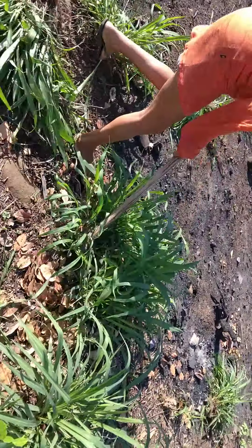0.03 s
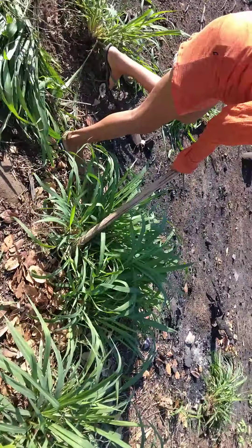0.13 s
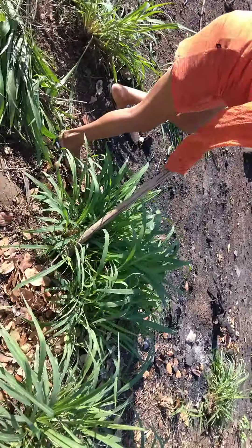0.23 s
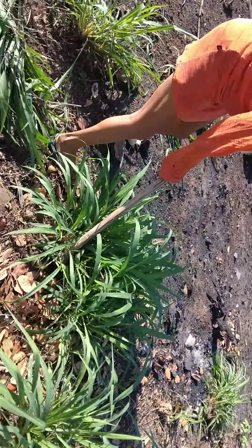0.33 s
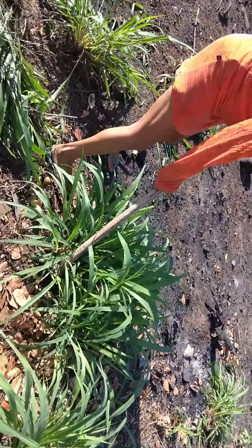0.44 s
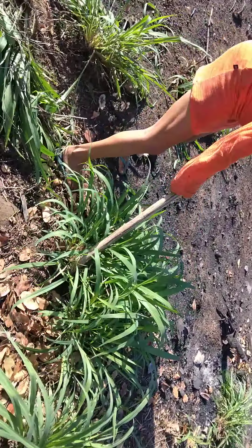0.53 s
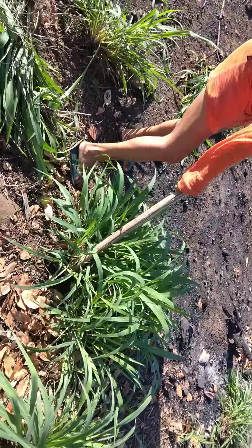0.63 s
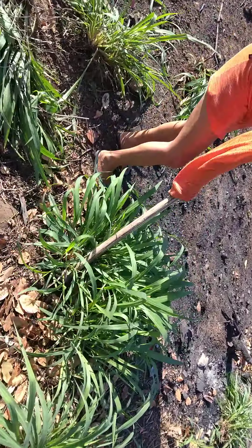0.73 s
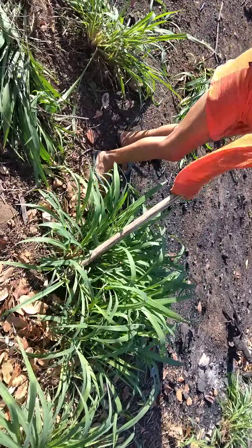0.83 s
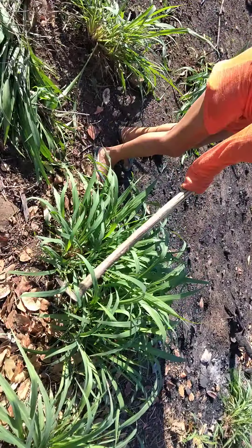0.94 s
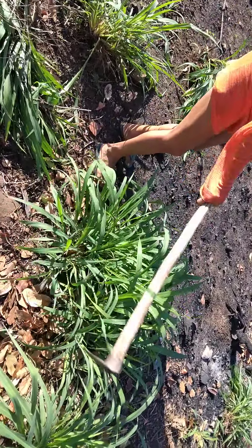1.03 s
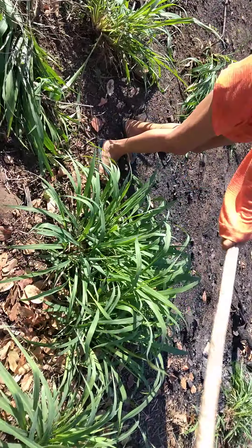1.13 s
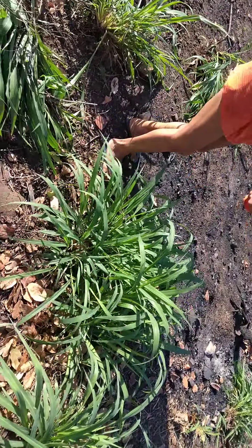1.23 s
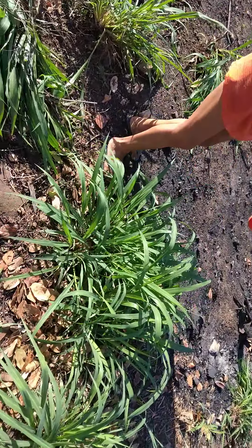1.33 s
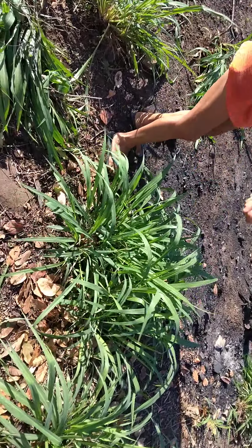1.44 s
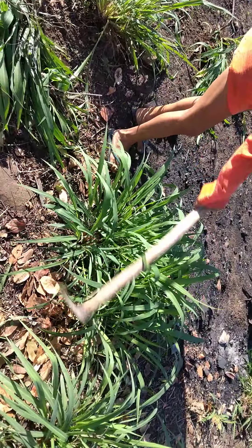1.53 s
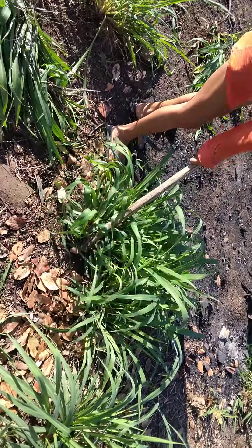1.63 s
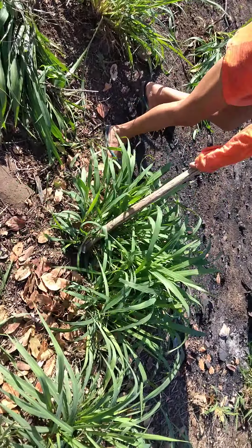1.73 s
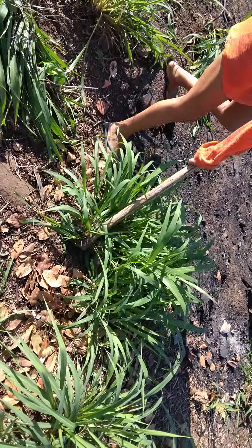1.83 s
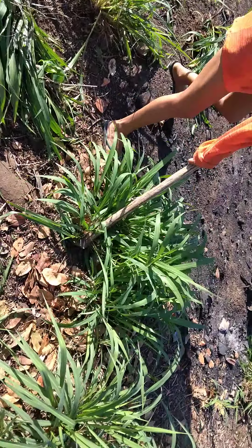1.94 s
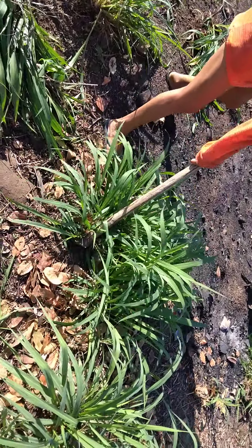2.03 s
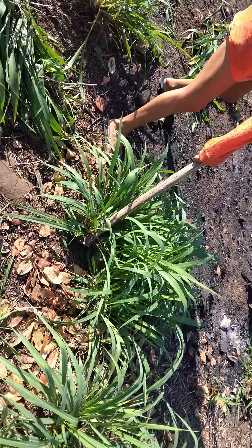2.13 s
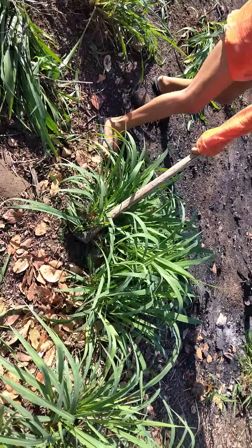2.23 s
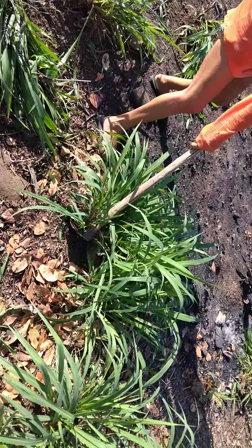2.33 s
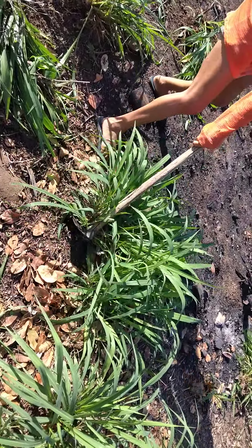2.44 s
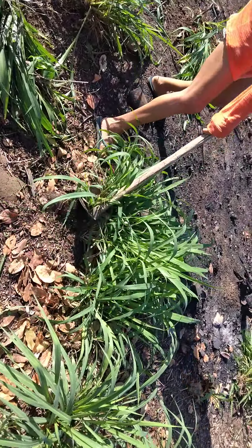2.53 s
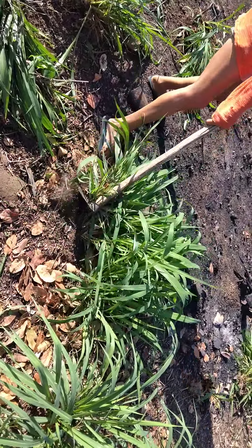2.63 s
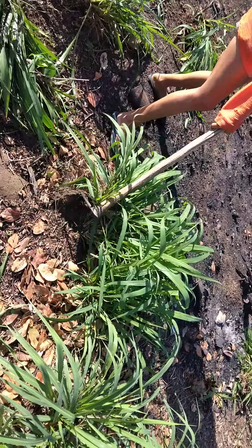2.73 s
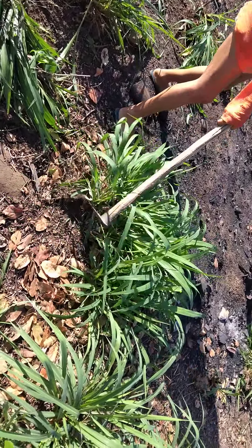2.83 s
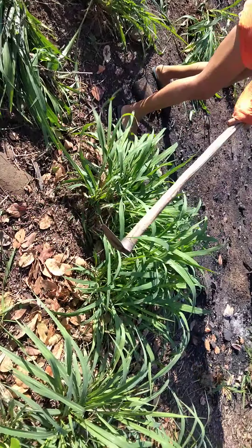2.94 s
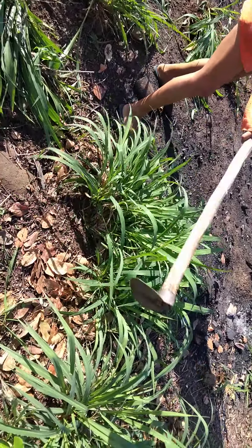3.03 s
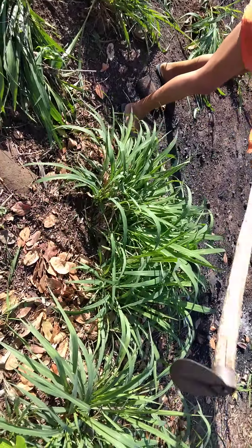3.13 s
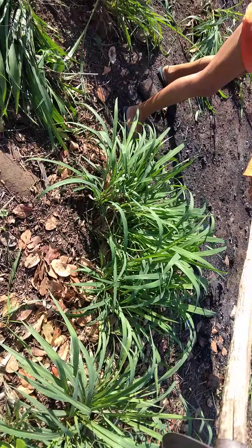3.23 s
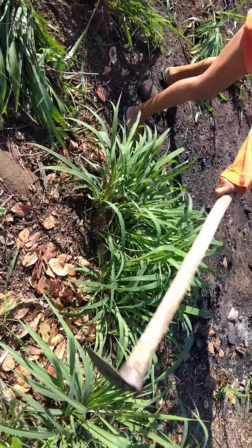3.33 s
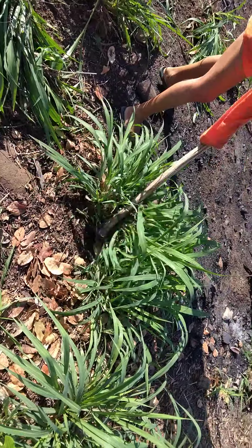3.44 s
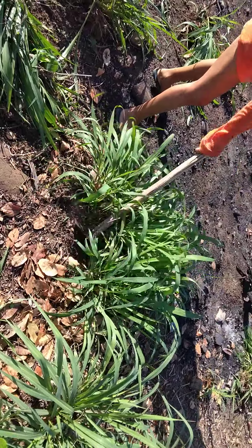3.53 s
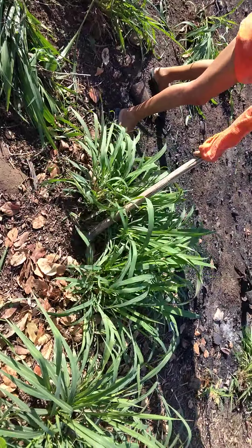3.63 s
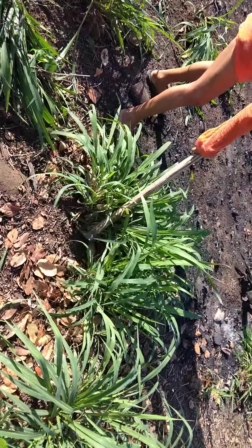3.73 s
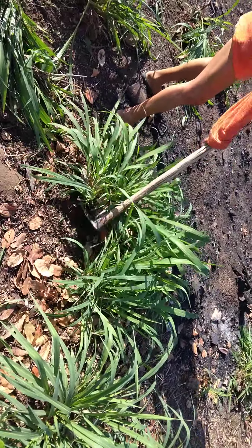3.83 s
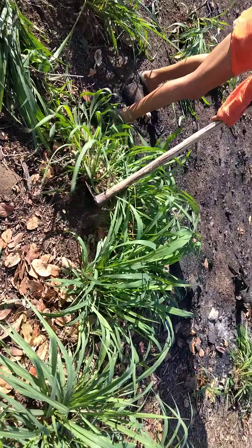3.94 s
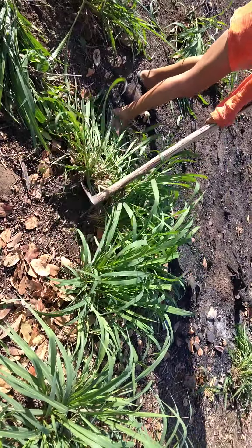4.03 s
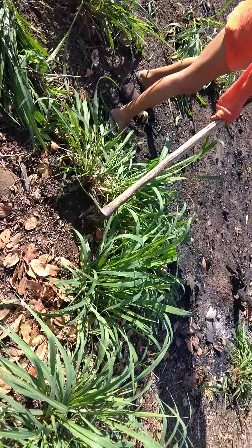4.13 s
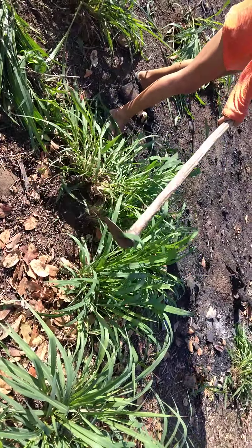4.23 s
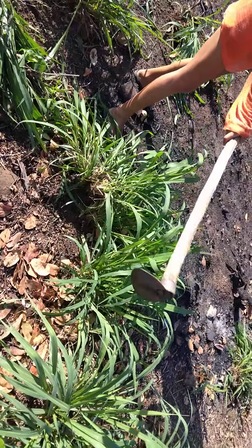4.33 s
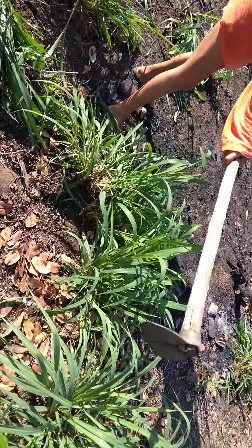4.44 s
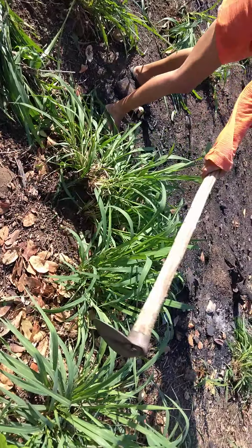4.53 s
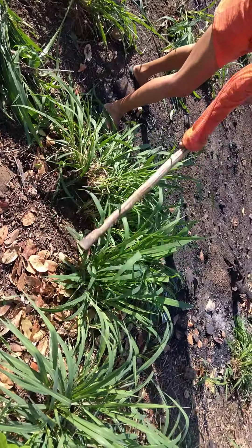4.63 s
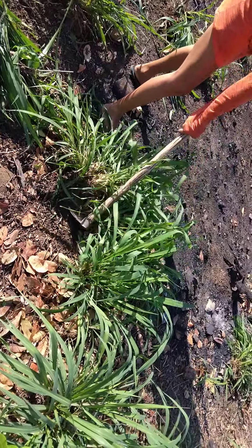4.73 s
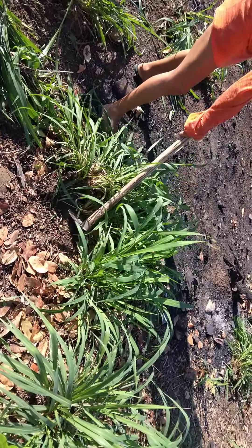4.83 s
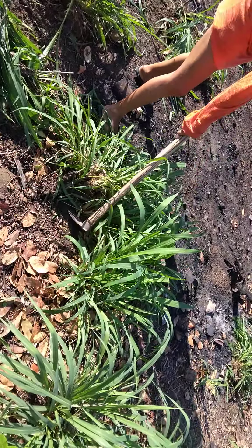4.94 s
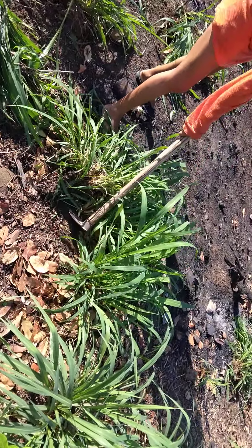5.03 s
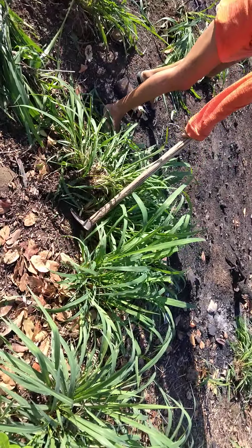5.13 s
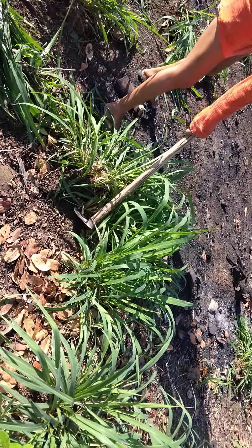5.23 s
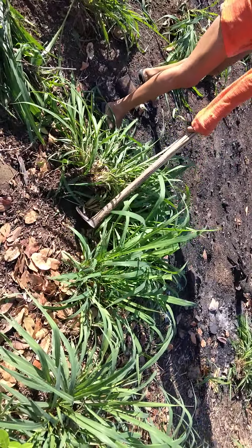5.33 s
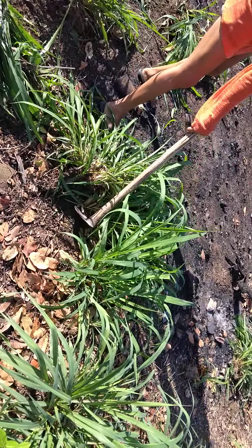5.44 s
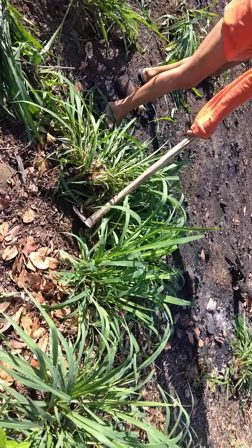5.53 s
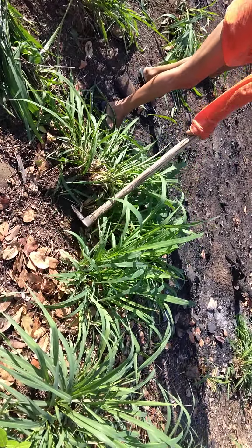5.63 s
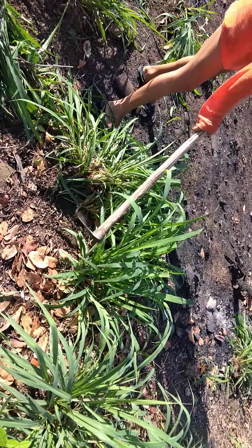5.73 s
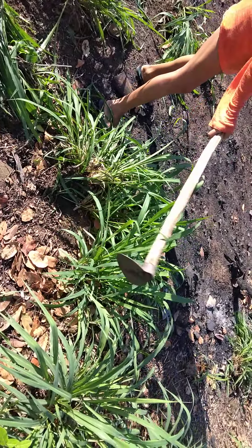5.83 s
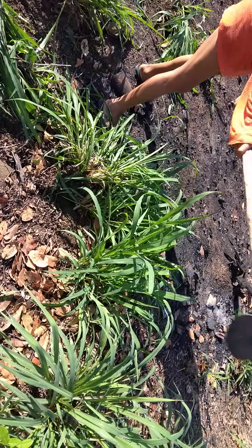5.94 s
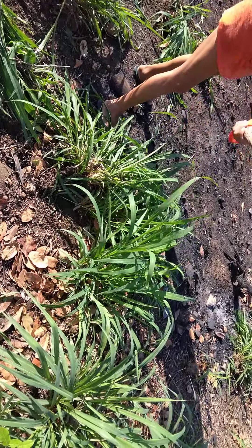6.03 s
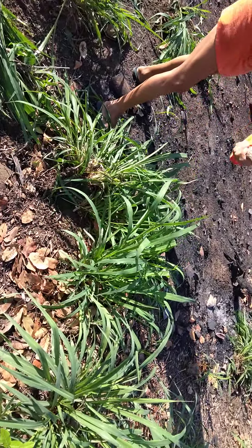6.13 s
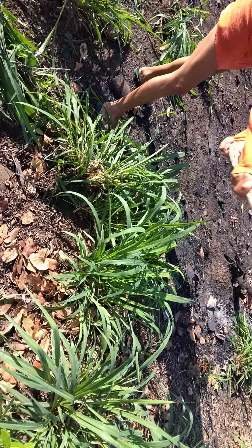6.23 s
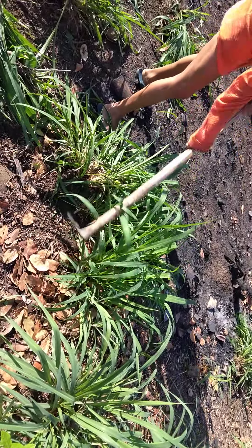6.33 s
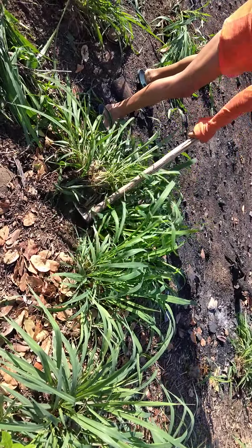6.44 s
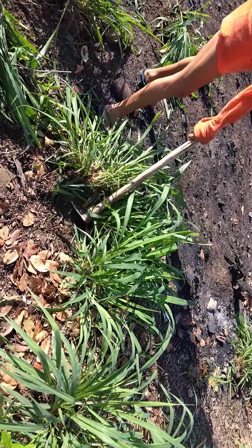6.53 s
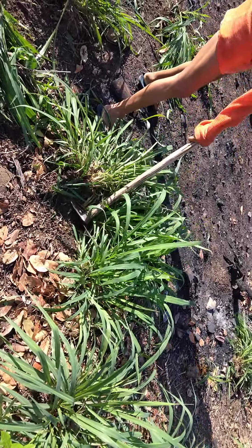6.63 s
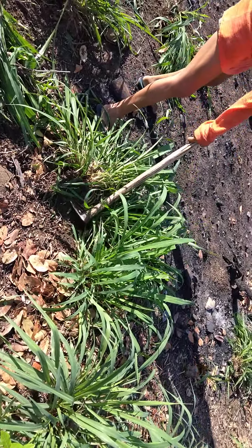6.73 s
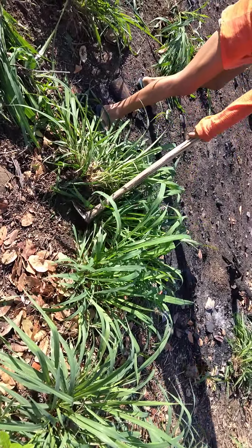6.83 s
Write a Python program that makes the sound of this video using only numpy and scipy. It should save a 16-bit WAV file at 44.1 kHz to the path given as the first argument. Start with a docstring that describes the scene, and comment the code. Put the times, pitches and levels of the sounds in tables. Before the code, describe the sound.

Close outdoor stereo sound of a hoe working a grass clump in dry soil. At 0.03 s the first and brightest blow slices leaves with a loud crunch and short thud. Rustling and gritty tugs swell around 0.5-1.1 s, then drop away. A low wind bump comes near 1.6 s as the second chop lands at 1.58 s; a strong tearing drag follows at 2.2-2.6 s, thick with snapping roots and crackling soil. After a lull, the third blow at 3.45 s crunches and thuds, with hard snaps and rustle at 3.8-3.9 s. The fourth, at 4.68 s, is softer and duller, followed by sparse ticks and a small leafy brush near 5.75 s. After quiet, the fifth at 6.37 s lands with a heavy thud and sharp woody clod knock, then light settling. Faint far bird notes and low wind lie beneath.

```python
"""A hand hoe chops five times into a grass clump on dry soil and is dragged back out, outdoors.
Each blow slices leaves, crunches and thuds; then the clump settles, and tugs make leaf and soil crackle.
Roots and stalks snap as short wavelets, which also give a low clod thud and the last blow's sharp knock.
From the second second on, far birds call as wavering sines with noise echoes.
Low noise and pops of wind buffet two unlike microphone ports over a far wash; a gate dims quiet treble."""
import sys
import numpy as np
from scipy import signal
from scipy.fft import rfft, irfft
from scipy.io import wavfile
from scipy.ndimage import uniform_filter1d

SR = 44100
rng = np.random.default_rng(int(sys.argv[2]) if len(sys.argv) > 2 else 0)


def undo_db(level):
    """Turn decibels back into plain size, where 20 dB means ten times bigger."""
    steps = np.asarray(level, float) / 20
    return 10 ** steps


def int16_out(signal):
    """Quantize to a 16-bit WAV file."""
    q = np.round(np.clip(np.atleast_2d(signal).T, -1, 1) * 32767)
    wavfile.write(sys.argv[1], SR, q.astype(np.int16))


N = 304290
T = np.arange(N) / SR
# samples by which the left port hears later, and its spread across the clump
LEFT_LAG_SAMPLES, LAG_SPREAD_SAMPLES = 3.33, 2.23

# hoe blows, levels ahead of the ports:
# start_s, crunch_db, grit_db, clod_knock_db, clod_pitch_hz, thud_db, crunch_length_s
BLOWS = [(0.028, -3, -7, -11, 848, -14, 0.008), (1.58, -9.5, -11, -15.5, 927, -13.5, 0.016),
         (3.446, -8, -11, -16.5, 374, -14.5, .010), (4.676, -15.5, -16.5, -12.5, 710, -10.5, 0.0097),
         (6.3692, -13, -10, -7, 432, -6.5, 0.0115)]
# modes of a knocked clod: multiple_of_clod_pitch, level_db, t60_s
CLOD_MODES = [(1., 6, 0.021), (1.95, 3, 0.017)]


def hoe():
    """Leaves hiss and soil crumbles under the drag; each blow slices in, crunches and thuds."""
    # packed ground: pitch_hz, level_db, t60_s
    thud_modes = [(70, -7, 0.07), (156, 0.5, 0.033)]
    # the hoe itself: pitch_hz, level_db, t60_s
    handle_modes = [(1323, -9.5, 0.026)]
    soil_db, soil_db_per_pull_db, soil_db_per_dryness = -65, 1.76, 0.87  # soil_db: at a -46 dB pull, dryness 0

    pull_db, dryness = pull()
    leaf = undo_db(pull_db)
    # harder pulls tear more soil
    soil = undo_db(soil_db + soil_db_per_pull_db * (pull_db + 46.0) - soil_db_per_dryness * dryness)

    ground, crunch = np.zeros(N), np.zeros(N)
    for start_s, crunch_db, grit_db, knock_db, clod_hz, thud_db, length_s in BLOWS:
        envelope = blow_envelope(T - start_s, length_s)
        crunch += undo_db(crunch_db) * envelope
        soil += undo_db(grit_db) * envelope
        add(ground, start_s + 0.19 * length_s, undo_db(crunch_db) * ring(handle_modes))
        # the blade stops midway through the crunch
        stop = undo_db(thud_db) * ring(thud_modes) + undo_db(knock_db) * ring(CLOD_MODES, clod_hz)
        add(ground, start_s + 0.55 * length_s, stop)

    fine = crackle(9000, spread_db=0.0, clump_db=1.5) + 0.35 * ticks(200)
    fine = filtered(fine, 2, 1800, "high")  # leaves are too small for bass
    low = filtered(fine, 1, 5500, "low")
    high = fine - low
    packed = low + 0.5 * high  # leaves crushed into soil sound duller
    rustle = low * undo_db(-0.4 * (dryness - 0.5)) + high * undo_db(0.78 * (dryness + 2.5))
    coarse = crackle(6000, spread_db=2.5, clump_db=2.5)
    coarse = evened(filtered(coarse, 1, (750, 2000), "band"))
    return leaf * rustle + crunch * packed + soil * coarse + heard_from(ground, LEFT_LAG_SAMPLES)


def blow_envelope(u, length_s):
    """The blade speeds up through the leaves for 19 ms, then bites: a burst, then falling debris."""
    slicing = undo_db(-14.5 + 430 * np.minimum(u, 0)) * (u > -0.019) * (u < 0)
    after = np.maximum(u, 0) / length_s
    burst = np.exp(-(np.maximum(after - 0.4, 0) / 0.6) ** 2)
    debris = 0.033 * np.exp(-after / 3.9)
    return slicing + np.minimum(after * 1.7, 1) * (burst + debris)


def pull():
    """Level in dB and dryness of the rustle: tugs swell and fade, the clump settles after each blow."""
    # tugs and brushes of the blade through the clump:
    # peak_s, rustle_db, swell_s, fade_s, dryness (higher is brighter)
    tugs = [(0.01, -33.5, 0.12, 0.053, 1), (0.493, -44.5, 0.18, 0.26, -10), (0.735, -34, 0.18, 0.15, -7.5),
            (0.875, -37, 0.05, 0.34, -2.5), (0.966, -36.5, 0.085, 0.06, -2.5),
            (1.05, -40, 0.081, 0.043, 3.5), (1.148, -52.5, 0.25, 0.45, -5.5),
            (2.259, -47, 0.41, 0.66, -11.5), (2.513, -28.5, 0.16, 0.18, -6.5),
            (2.708, -39.5, 0.41, 0.48, -6.5), (3.425, -43, 0.062, 0.076, -3.5),
            (3.75, -49.5, 0.86, 0.71, -8.5), (3.827, -31, 0.038, 0.23, -5), (3.89, -32, 0.19, 0.45, -4),
            (5.34, -51.5, 0.45, 0.89, -6), (5.714, -52, 0.27, 0.23, -3), (5.731, -41.5, 0.018, 0.06, 4),
            (5.752, -48, 0.06, 0.025, 0.5), (5.819, -42.5, 0.024, 0.083, 5),
            (6.833, -48.5, 0.061, 0.23, -6.5)]
    span_db, bend = 22.5, 0.99  # fall over one swell_s or fade_s, and the exponent of its course in time
    # two stages of settling after a blow: start_db, fall_db_per_s
    settling = [(-31.5, 152), (-40, 42.7)]
    settle_dryness, settle_after_s = -3.5, 0.022
    # rustle held back while the hoe is lifted clear or held still: from_s, to_s
    pauses = [(1.222, 1.54), (2.02, 2.10), (3.1, 3.385), (4.418, 4.64), (5.05, 5.153), (5.527, 5.555),
              (5.884, 6.33)]
    pause_drop_db, pause_edge_s = -8.5, 0.0056
    still_db, still_dryness = -67, -0.5  # floor of stirring leaves

    power, dry_power = np.zeros(N), np.zeros(N)
    for peak_s, rustle_db, swell_s, fade_s, dryness in tugs:
        away = np.where(T < peak_s, (peak_s - T) / swell_s, (T - peak_s) / fade_s)
        part = undo_db(2 * (rustle_db - span_db * abs(away) ** bend))
        power += part
        dry_power += part * dryness
    for start_s, *_ in BLOWS:
        u = T - start_s
        stages = sum(undo_db(2 * (db - fall * abs(u - settle_after_s))) for db, fall in settling)
        part = stages * (u > 0)
        power += part
        dry_power += part * settle_dryness

    paused = sum(np.clip(np.minimum(T - a, b - T) / pause_edge_s, 0, 1) for a, b in pauses)
    left, still = undo_db(2 * pause_drop_db * paused), undo_db(2 * still_db)
    power = power * left + still
    dry_power = dry_power * left + still * still_dryness
    return 10 * np.log10(power), dry_power / power


def crackle(per_s, spread_db, clump_db, count=7):
    """Tiny clicks with clumped levels, scattered over several spots of the plant."""
    clumps = evened(uniform_filter1d(rng.standard_normal(N), size=900))
    size = undo_db(spread_db * np.minimum(rng.exponential(1, N), 5) + clump_db * clumps)
    clicks = size * rng.standard_normal(N) * (rng.random(N) < per_s / SR)
    spot = rng.integers(0, count, N)
    lags = LEFT_LAG_SAMPLES + LAG_SPREAD_SAMPLES * np.linspace(-1, 1, count) * np.sqrt(3)
    return evened(sum(heard_from(clicks * (spot == k), lag) for k, lag in enumerate(lags)))


def ticks(per_s):
    """Sparse crisp leaf ticks of a few milliseconds, in nine groups each with its own pitch and spot."""
    t, out = np.arange(300) / SR, np.zeros((2, N))
    for hz, side in zip(np.geomspace(2200, 11000, 9), rng.uniform(-1, 1, 9)):
        size = undo_db(1.3 * np.minimum(rng.exponential(1, N), 3.5))
        hits = size * (rng.random(N) < per_s / 9 / SR)
        grain = filtered(rng.standard_normal(300), 1, (hz * 0.7, hz * 1.4), "band")
        burst = signal.oaconvolve(hits, grain * undo_db(-60 * t / 0.008))[:N]
        out += heard_from(burst, LEFT_LAG_SAMPLES + LAG_SPREAD_SAMPLES * side)
    return evened(out)


def ring(modes, unit_hz=1):
    """Damped modes that are driven up within a few milliseconds."""
    t = np.arange(5000) / SR
    rise = 1 - np.exp(-t / 0.0015)
    return rise * sum(undo_db(db - 60 * t / t60_s) * np.sin(2 * np.pi * unit_hz * f * t) for f, db, t60_s in modes)


def snaps_and_knocks():
    """Each snap or knock is a short wavelet, five weaker ones within 6 ms and a jolt of the clod."""
    # breaking roots and stalks, plus a low clod thud at 2.8 s and the sharp knock of the last blow;
    # levels ahead of the ports: start_s, peak_db, pitch_hz
    hits = [(0.2693, -25, 7860), (0.7554, -18, 3200), (0.7908, -19.5, 4630), (1.0109, -16.5, 5560),
            (1.544, -27.5, 5000), (1.5624, -26, 3680), (2.07, -33.5, 4550), (2.2263, -6, 2950),
            (2.3069, -18.5, 2430), (2.3929, -14, 3230), (2.4347, -10.5, 3080), (2.4469, -9, 4050),
            (2.4509, -14.5, 2380), (2.4601, -10, 2170), (2.4647, -19, 2000), (2.4901, -8, 3350),
            (2.506, -10.5, 3600), (2.5128, -7.5, 2610), (2.5237, -13, 2620), (2.5679, -14.5, 2920),
            (2.802, -32, 897), (3.3902, -34, 3640), (3.431, -26, 3170), (3.4899, -16, 1500),
            (3.5705, -24.5, 1500), (3.8221, -4, 7300), (3.8309, -15.5, 2220), (3.8364, -21, 2500),
            (3.8506, -12, 2920), (3.857, -15, 3300), (3.8813, -4.5, 3040), (3.9204, -15, 3300),
            (4.2469, -30.5, 3520), (4.6441, -29, 2470), (4.657, -25, 885), (5.0313, -37.5, 7000),
            (5.1568, -35.5, 2950), (5.6027, -33, 3750), (5.7306, -41, 4600), (5.8122, -23.5, 6500),
            (5.839, -24, 4240), (6.016, -43.5, 4470), (6.121, -45, 5090), (6.245, -44.5, 4510),
            (6.333, -24.5, 1800), (6.357, -14.5, 3300), (6.3737, -2, 775), (6.8882, -18.5, 4260)]
    out, t = np.zeros(N), np.arange(-60, 61) / SR
    chance = rng.random((len(hits), 6, 3))
    for (start_s, peak_db, pitch_hz), rows in zip(hits, chance):
        for k, (when, pitch, loss) in enumerate(rows):
            f = pitch_hz * (1 if k == 0 else 0.46 + 0.81 * pitch)
            wavelet = -np.cos(2 * np.pi * f * t) * np.exp(-(t * f / 0.39) ** 2)
            delay_s = 0.0009 * (k + when - 0.5) * (k > 0)
            weaker_db = (k > 0) * (2 + 12 * loss + 2 * k)
            add(out, start_s + delay_s - 0.0005, undo_db(peak_db - weaker_db) * wavelet)
        # lower hits jolt the clod more
        add(out, start_s, undo_db(peak_db - 18.5 - pitch_hz / 500) * ring(CLOD_MODES, 320))
    return heard_from(out, LEFT_LAG_SAMPLES)


def at_ports(airborne):
    """Cavity resonances of each port colour the near sounds."""
    # cavity response of each port: pitch_hz, gain_db
    left_port = [(200, -7.5), (1000, -17), (2200, -9.5), (3700, -1), (5500, -6.5), (6500, -9), (7600, 0.5),
                 (8900, -11.5), (12000, -22.5), (16000, -20.5)]
    right_port = [(200, -6.5), (1200, -16.5), (3700, -13), (6000, -15.5), (8000, -16.5), (9500, -12),
                  (10700, -4), (12500, -16.5), (16000, -27.5)]
    responses = np.array([causal(left_port), causal(right_port)])
    return undo_db(5.5) * signal.oaconvolve(airborne, responses, axes=1)[:, :N]


def birds():
    """Soft wavering notes from far away, each trailed by a blurred echo off the field."""
    # start_s, length_s, pitch_hz, level_db
    notes = [(1.233, 0.11, 2690, -68.5), (2.972, 0.053, 682, -64), (4.283, 0.029, 703, -61.5),
             (4.424, 0.22, 2515, -69), (5, 0.15, 2650, -69.5), (6.442, 0.069, 689, -49.5)]
    out, t = np.zeros(N), np.arange(8000) / SR
    for start_s, length_s, pitch_hz, level_db in notes:
        size = round(length_s * SR)
        waver = evened(uniform_filter1d(rng.standard_normal((2, size)), size=600))
        tone = np.sin(2 * np.pi * np.cumsum(pitch_hz + 7 * waver[0]) / SR)
        note = tone * undo_db(1.5 * waver[1]) * signal.windows.tukey(size, 0.6)
        echo = rng.standard_normal(len(t)) * undo_db(-36 - 60 * t / 0.25)
        echo[0] = 1  # direct sound
        add(out, start_s, undo_db(level_db) * signal.oaconvolve(note, echo))
    return np.array([out, out])


def wind():
    """Lumpy low pressure noise at each port, plus single pops."""
    # course of the wind: time_s, level_db, left_over_right_db
    course = [(0.0, -47, -4), (0.46, -46, -0.5), (0.92, -42, -20), (1.192, -56, -1.5), (1.61, -34, -1),
              (1.82, -46.5, -13.5), (2.419, -50.5, -4), (6.9, -51, -8.5)]
    # single gust pops: centre_s, level_db, left_over_right_db, width_s
    pops = [(0.612, -39, -16, 0.0058), (0.95, -40.5, -31, 0.0058), (1.519, -42, -15, 0.0076),
            (1.617, -25, 13.5, 0.017), (1.898, -36.5, -27, 0.0031), (2.009, -40, -26, 0.0028),
            (2.052, -38.5, -11.5, 0.0043), (4.323, -35.5, -28.5, 0.0037), (4.436, -44.5, -21.5, 0.0025),
            (4.545, -37, -16, 0.0088)]
    # spectrum: pitch_hz, relative_level_db
    colour = [(5, 2), (20, 1), (60, -10), (120, -17.5), (200, -30.5), (400, -58)]

    time_s, level_db, pan_db = np.transpose(course)
    level_db, pan_db = np.interp(T, time_s, level_db), np.interp(T, time_s, pan_db)
    slow = uniform_filter1d(uniform_filter1d(rng.standard_normal((2, N)), 2500), 1500)
    lumps = undo_db(2.5 * evened(slow))
    noise = evened(lumps * coloured(rng.standard_normal((2, N)), colour))
    out = noise * undo_db([level_db + pan_db / 2, level_db - pan_db / 2])

    for centre_s, pop_db, side_db, width_s in pops:
        u = np.arange(-4 * width_s, 4 * width_s, 1 / SR) / width_s
        pulse = (1 - 0.7 * u ** 2 - 0.3 * u) * np.exp(-u ** 2 / 2)
        gains = undo_db(np.array([[pop_db + side_db / 2], [pop_db - side_db / 2]]))
        add(out, centre_s - 4 * width_s, gains * pulse)
    return out


def far_hum():
    """A low steady wash of the open field: coloured noise, unrelated at the two ports."""
    # spectrum: pitch_hz, relative_level_db
    colour = [(60, -19.5), (150, -4.5), (300, -7), (600, -12.5), (1000, -21), (3000, -15), (16000, -35)]
    return undo_db(-63) * coloured(rng.standard_normal((2, N)), colour)


def evened(x):
    """Scales to rms 1."""
    return x / np.sqrt(np.mean(x ** 2) + 1e-20)


def filtered(x, order, hz, kind):
    """Butterworth filter along time."""
    return signal.sosfilt(signal.butter(order, hz, kind, fs=SR, output="sos"), x)


def read(points, hz):
    """Straight lines on a log-frequency axis."""
    f, value = np.transpose(points)
    return np.interp(np.log(hz + 1), np.log(f + 1), value)


def coloured(x, points):
    """Shapes the spectrum of a steady noise."""
    gain = undo_db(read(points, np.fft.rfftfreq(N, 1 / SR)))
    return evened(irfft(rfft(x) * gain, N))


def causal(points, size=1024):
    """Minimum-phase response with the given gain."""
    log_gain = read(points, abs(np.fft.fftfreq(size, 1 / SR))) * np.log(10) / 20
    return np.fft.ifft(np.exp(np.conj(signal.hilbert(log_gain)))).real[:size // 2]


def heard_from(x, lag_samples):
    """Both ports hear one spot, the left one lag_samples later."""
    turn = np.exp(-2j * np.pi * np.fft.rfftfreq(N) * lag_samples)
    return np.array([irfft(rfft(x) * turn, N), x])


def add(mix, start_s, sound):
    """Mixes a sound in at start_s."""
    part = mix[..., round(start_s * SR):][..., :sound.shape[-1]]
    part += sound[..., :part.shape[-1]]


def scene():
    """The near sounds pass the port cavities; wind acts on the ports directly."""
    return at_ports(hoe() + snaps_and_knocks()) + birds() + far_hum() + wind()


def gate(x):
    """Lowers everything above 1 kHz while that band is quiet; opens fast and holds some 6 ms."""
    threshold_db, knee_db, depth_db = -64.5, 2.22, -31.5
    treble = signal.sosfiltfilt(signal.butter(4, 1050, "high", fs=SR, output="sos"), x)
    # the 301-sample mean looks mostly back in time
    power = uniform_filter1d((treble ** 2).mean(0), 301, origin=110)
    level_db = 10 * np.log10(abs(power) + 1e-14)
    shut = 1 / (0.5 + np.exp((level_db - threshold_db) / knee_db))  # nears 2 in silence: twice depth_db
    return x + (undo_db(depth_db * uniform_filter1d(shut, size=100)) - 1) * treble


def low_pass(x):
    """Removes everything above the highest recorded frequency."""
    return signal.sosfilt(signal.butter(12, 16000, fs=SR, output="sos"), x)


def record(dry):
    """The gate dims quiet treble, then loud peaks round off."""
    mix = np.tanh(gate(dry) / 0.91)
    return low_pass(mix)


dry = scene()
out = record(dry)
int16_out(out)
```